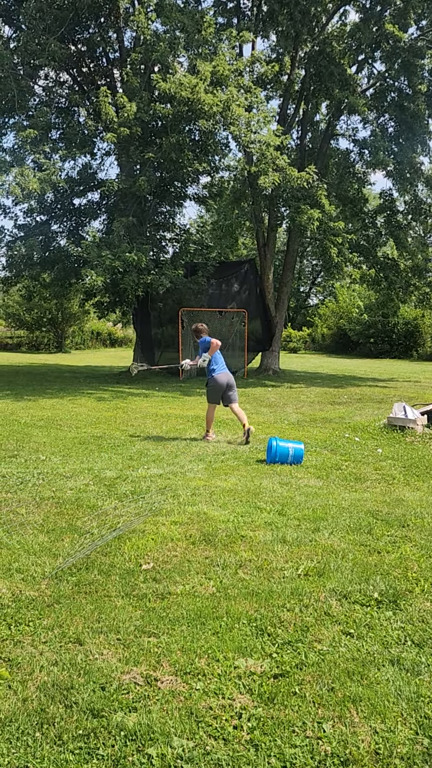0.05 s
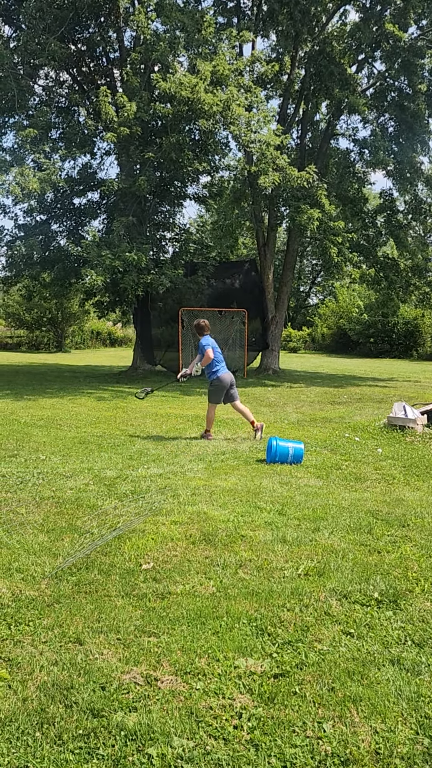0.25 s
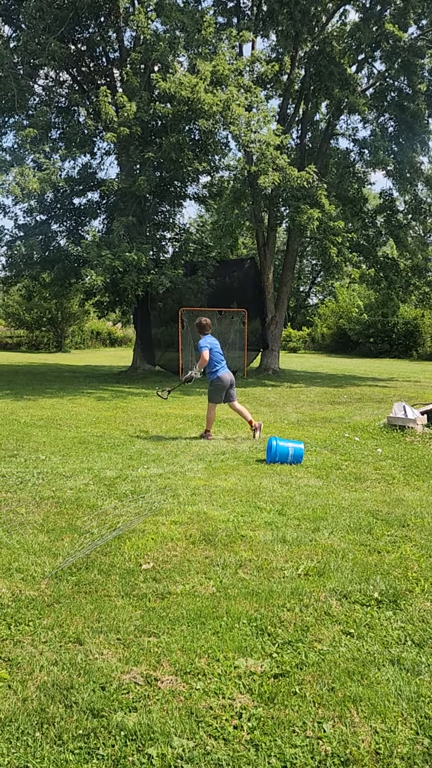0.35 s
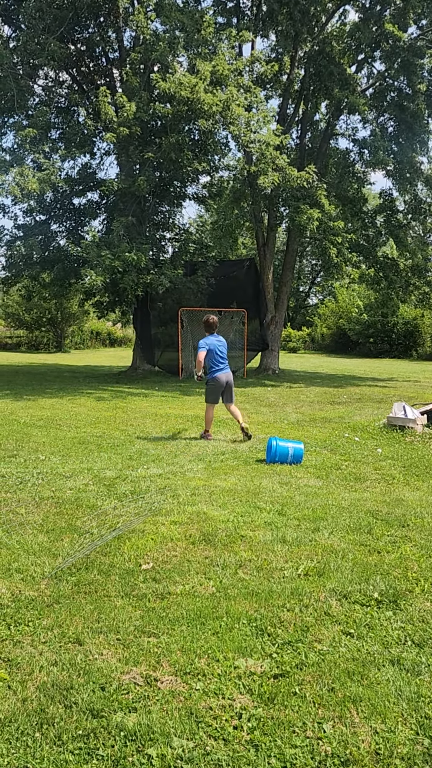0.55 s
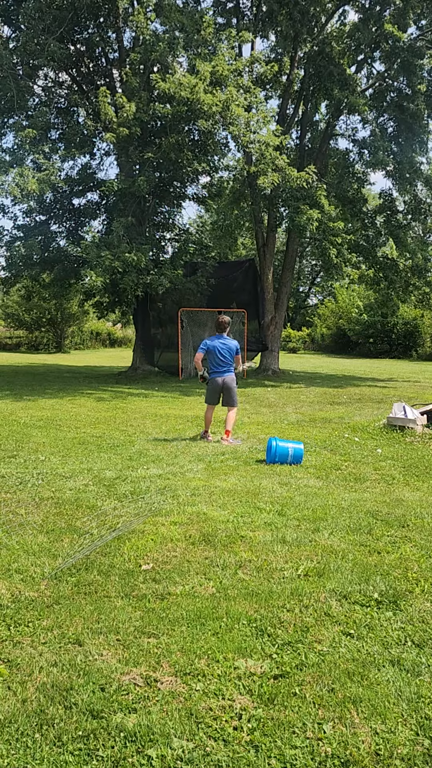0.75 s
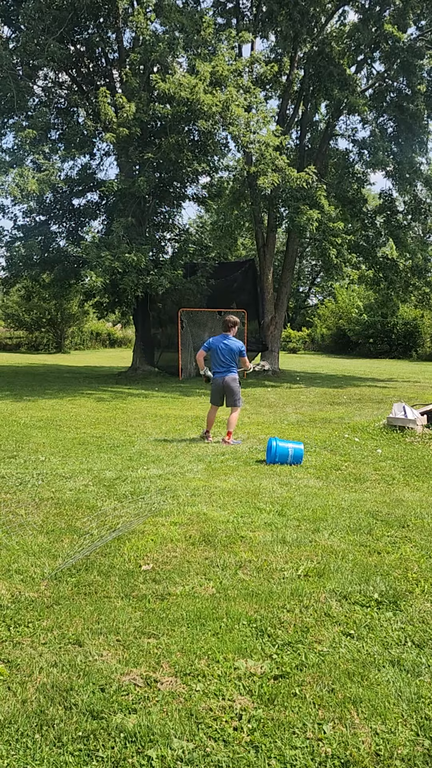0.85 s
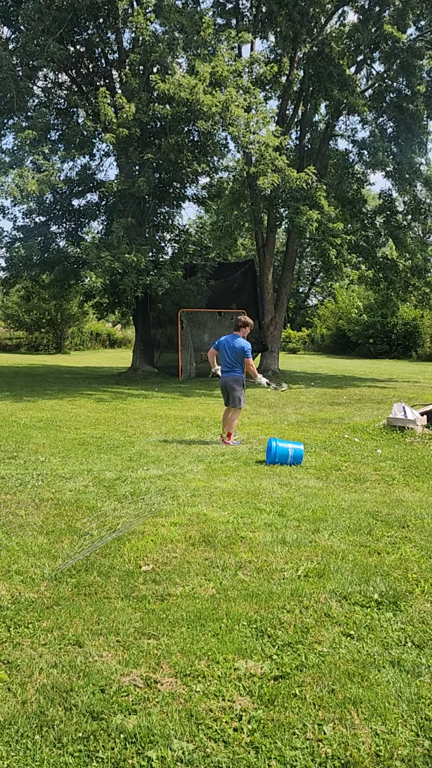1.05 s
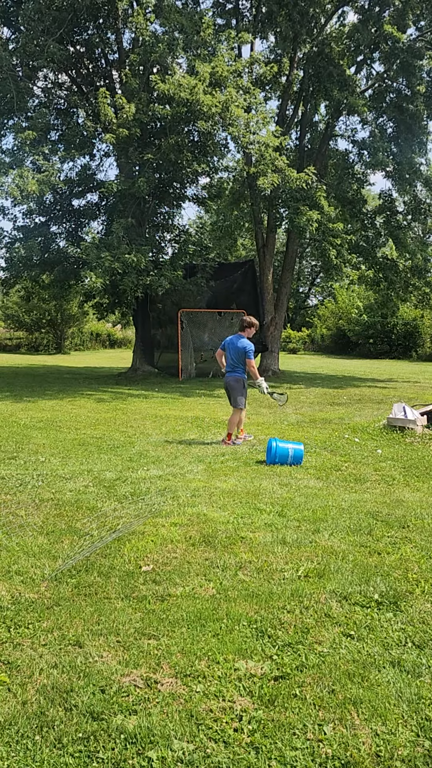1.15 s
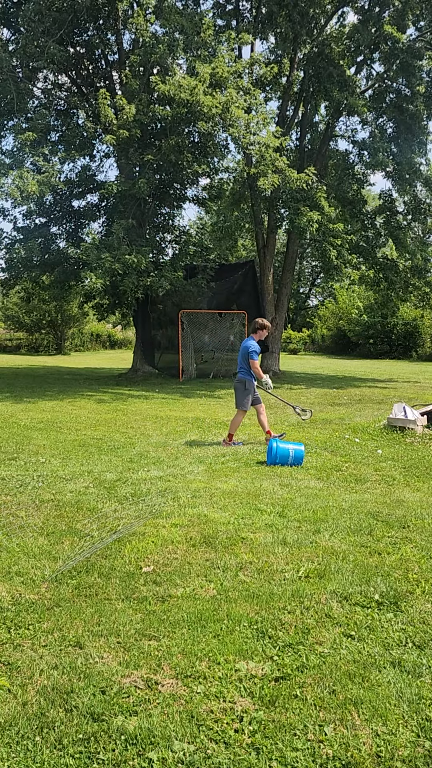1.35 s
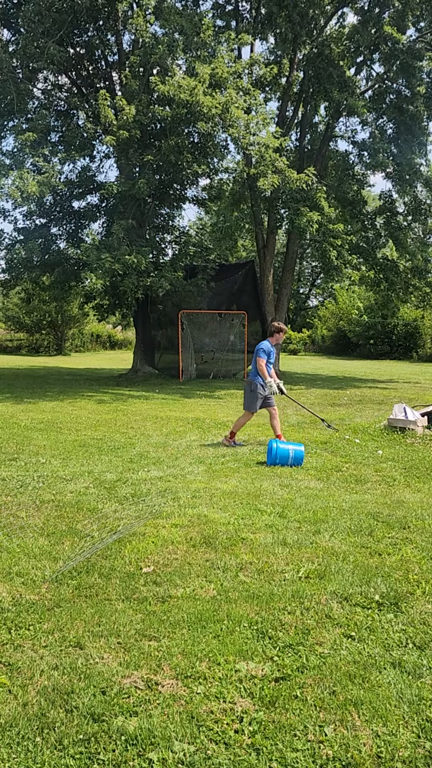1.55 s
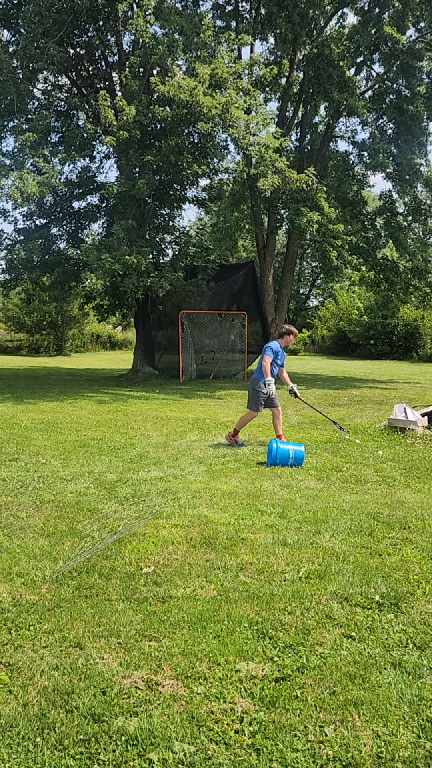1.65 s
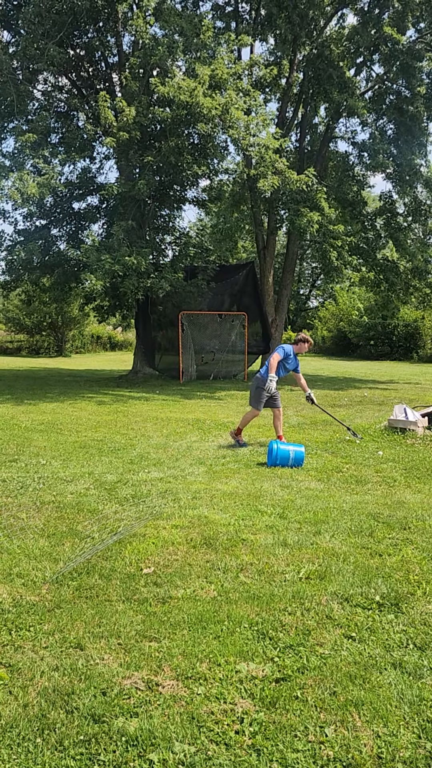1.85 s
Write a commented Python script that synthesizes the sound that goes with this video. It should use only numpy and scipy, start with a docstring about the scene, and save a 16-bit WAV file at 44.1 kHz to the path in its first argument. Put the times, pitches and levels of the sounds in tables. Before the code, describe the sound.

A ball hits a backstop net with a deep thump and hollow crack, followed by a brief flutter and rustle. Faint insect chirping and outdoor rumble continue across the lawn, and a finger taps near the right microphone.

```python
"""On a lawn, an insect chirps high and fast with its wing strokes over outdoor rumble, faint swishes
and a far machine's whine. A hard-thrown ball thumps into a hanging backstop: the sheet slaps twice,
cracks with a hollow ring, billows and flutters, and its shaken netting rattles and settles.
Later a finger brushes and taps the camera by its right microphone."""
import sys
import numpy as np
from scipy.fft import rfft, irfft, next_fast_len
from scipy.io import wavfile
from scipy.ndimage import uniform_filter1d, minimum_filter1d, map_coordinates

SR = 44100
rng = np.random.default_rng(int(sys.argv[2]) if len(sys.argv) > 2 else 0)


def unload_audio(sound):
    """Save the sound as a 16-bit wav file, at the path given as the first command line argument."""
    columns = np.transpose(np.atleast_2d(sound))
    # keep every value between -1 and 1, then stretch to whole-number steps
    steps = np.round(np.clip(columns, -1, 1) * 32767)
    wavfile.write(sys.argv[1], SR, steps.astype(np.int16))


N = 83790
TIME = np.arange(N) / SR


def amp(db):
    """Decibels to amplitude ratio."""
    return 10 ** (np.asarray(db) / 20)


def unit(x):
    """Normalisation to rms 1."""
    return x / np.sqrt(np.mean(x ** 2) + 1e-20)


def along(points, hz):
    """Interpolation on a logarithmic frequency axis."""
    knots, values = np.transpose(points)
    return np.interp(np.log(hz + 1), np.log(knots + 1), values)


def contour(points):
    """Linear interpolation in time."""
    return np.interp(TIME, *np.transpose(points))


def pan(db):
    """Stereo gains for a level difference, left over right."""
    return amp(np.array([[db], [-db]]) / 2)


def wobble(rate):
    """Random modulation: a spline through `rate` Gaussian values a second."""
    return map_coordinates(rng.standard_normal(int(N * rate / SR) + 4), [TIME * rate])


def filtered(x, response):
    """Linear filtering: the spectrum times a frequency response."""
    size = next_fast_len(N + SR // 2)
    return irfft(rfft(x, size) * response(np.fft.rfftfreq(size, 1 / SR)), size)[..., :N]


# Coherence of the outdoor field: (frequency [Hz], left-right correlation [1])
FIELD_COHERENCE = [(60, 1), (130, .99), (290, 0.99), (640, 0.87), (1400, 0.42), (3100, 0), (15000, 0)]
def noise(spectrum, coherence=FIELD_COHERENCE):
    """Partially coherent stereo noise of rms 1: the mid-side ratio sets the correlation."""
    def response(hz):
        angle = np.arccos(np.clip(along(coherence, hz), -1, 1)) / 2
        return amp(along(spectrum, hz)) * [np.cos(angle), np.sin(angle)]
    mid, side = filtered(rng.standard_normal((2, N)), response)
    return unit(np.array([mid + side, mid - side]))


def fade(start, t60, attack):
    """Exponential decay, 60 dB in t60 seconds, after a quick rise."""
    age = np.maximum(TIME - start, 0)
    return (1 - np.exp(-age / attack)) * np.exp(-np.log(1000) * age / t60)


def ring(start, hz, t60):
    """Free vibration of one damped mode."""
    return np.sin(2 * np.pi * hz * (TIME - start)) * fade(start, t60, attack=.00084)


def push(centre, hz):
    """Pressure pulse radiated by a surface that is shoved out and springs back."""
    phase_squared = (np.pi * hz * (TIME - centre)) ** 2
    return (1 - 2 * phase_squared) * np.exp(-phase_squared)


# Outdoor air: (frequency [Hz], relative level [dB])
AIR_SPECTRUM = [(12, -53), (20, -33), (40, -2), (53, 0), (126, -5), (157, -11), (225, -9), (259, -16),
                (289, -9.5), (324, -19), (465, -13), (581, -15.5), (767, -19.5), (834, -20), (1070, -19.5),
                (1230, -22), (2470, -29), (2680, -34.5), (3850, -32.5), (5090, -39), (8640, -36.5),
                (9390, -54), (15500, -55.5)]
# Drift of the whole air noise: (time [s], gain [dB])
AIR_DRIFT = [(0, 3), (.12, 1.5), (.35, .3), (.8, 0), (1.3, -.4), (1.9, -.3)]
# Further sway of its low band: (time [s], gain [dB])
RUMBLE_SWAY = [(0, -1), (.5, 0), (.78, .5), (1.15, -3), (1.45, -2), (1.72, -3), (1.9, .5)]
def air(crossover_hz=210):
    """Broadband ambient noise under slow amplitude modulation, deeper in the low rumble."""
    broadband = amp(-46.5 + contour(AIR_DRIFT) + .68 * wobble(8.08)) * noise(AIR_SPECTRUM)
    rumble = filtered(broadband, lambda hz: 1 / (1 + (hz / crossover_hz) ** 4))
    sway = amp(contour(RUMBLE_SWAY) + .8 * wobble(12))
    return broadband - rumble + sway * rumble


# Partials of the far machine: (frequency [Hz], rms level [dB])
WHINE_PARTIALS = [(759.5, -61), (1051, -64), (1810, -68), (2394.5, -76.5)]
def machine_whine():
    """A line spectrum, each partial wavering in amplitude and phase."""
    whine = np.zeros((2, N))
    for hz, db in WHINE_PARTIALS:
        peak = np.sqrt(2) * amp(db + 1.46 * wobble(4.12))
        phase_drift = .38 * np.array([wobble(5.2), wobble(4.9)])
        whine += peak * np.sin(2 * np.pi * hz * TIME + phase_drift)
    return whine


# Balance of the ambience: (frequency [Hz], left over right [dB])
AMBIENT_BALANCE = [(100, 0.55), (700, 0.9), (1300, 3), (2400, -0.8), (7000, 4.5), (15000, -1.5)]
def ambience():
    """Air and machine superpose, with a level difference that depends on frequency."""
    return filtered(air() + machine_whine(), lambda hz: pan(along(AMBIENT_BALANCE, hz))[:, 0])


# Bouts of chirps: (start [s], end [s], period [s], start level [dB], end level [dB])
CHIRP_BOUTS = [(.001, .29, .0544, -63.2, -63.2), (.4045, 1.91, .0531, -65.5, -65.5)]
def insect(stroke_s=.024, crest_hz=8690, sag_hz=1300, flick_hz=450):
    """Frequency modulation: each wing stroke is a thin whistle that arches, then drops at its end."""
    chirps = np.zeros(N)
    for first, last, period, start_db, end_db in CHIRP_BOUTS:
        for start in np.arange(first, last, period):
            progress = np.clip((TIME - start - rng.normal(0, .00068)) / stroke_s, 0, 1)
            arch = crest_hz + rng.normal(0, 25) - sag_hz * (progress - .42) ** 2
            hz = arch - flick_hz * rng.uniform(.5, 1.5) * progress ** 6
            db = np.interp(start, [first, last], [start_db, end_db]) + rng.normal(0, .6)
            envelope = amp(db) * np.abs(np.sin(np.pi * progress)) ** .4
            chirps += envelope * np.sin(2 * np.pi * np.cumsum(hz) / SR)
    return pan(db=16) * chirps * amp(wobble(330))


# Faint swishes: (time [s], level [dB], half-width [s])
SWISHES = [(.06, -77, 0.14), (.215, -76, .03), (.47, -79.5, .014), (.525, -81, .012), (.567, -81, .005),
           (.71, -78, .025)]
# Their hiss: (frequency [Hz], relative level [dB])
SWISH_SPECTRUM = [(4000, -12), (7000, -4), (10000, 0), (11700, 3.5), (15500, -9)]
def swishes():
    """High noise comes and goes under Gaussian envelopes."""
    envelope = sum(amp(db) * np.exp(-((TIME - centre) / width) ** 2) for centre, db, width in SWISHES)
    return envelope * noise(SWISH_SPECTRUM)


# Slaps of the sheet: (time [s], peak level [dB], rise time [s])
SHEET_SLAPS = [(.2425, 0, 0.0031), (.2740, -11, 0.0049)]
IMPACT_S = SHEET_SLAPS[0][0]
def thump(start_hz=246, end_hz=65.4, slacken_s=.0061, cutoff_hz=345):
    """Damped oscillation that slows as the sheet gives; the soft sheet acts as a low-pass filter."""
    swings = np.zeros(N)
    for start, db, rise in SHEET_SLAPS:
        age = np.maximum(TIME - start, 0)
        cycles = end_hz * age + (start_hz - end_hz) * slacken_s * (1 - np.exp(-age / slacken_s))
        envelope = (age / rise * np.exp(1 - age / rise)) ** 1.96
        swings -= amp(db) * envelope * np.sin(2 * np.pi * cycles)
    return filtered(swings, lambda hz: 1 / np.sqrt(1 + (hz / cutoff_hz) ** 12))


# The settling net: (frequency [Hz], relative level [dB])
SETTLE_SPECTRUM = [(2000, -22), (4000, 3), (6000, -5), (7200, 4), (9500, -8), (12300, -4), (15500, -10)]
def net_settling():
    """Slow exponential decay: the net rustles faintly from the impact on."""
    rustle = unit(noise(SETTLE_SPECTRUM) * amp(2 * wobble(65)))
    return amp(-63) * rustle * fade(IMPACT_S, t60=1.2, attack=.004)


# Cracks of taut fabric: (time [s], level [dB], t60 [s], ring level [dB])
FABRIC_CRACKS = [(.2428, -16.5, 0.025, -33.5), (.2690, -33, 0.044, -27.5), (.2750, -35, 0.032, -38.5)]
# Their noise: (frequency [Hz], relative level [dB])
CRACK_SPECTRUM = [(150, -24), (420, -20), (600, -8), (950, 0), (1400, -13), (2000, -18), (2600, -22),
                  (3300, -19), (4500, -26), (7000, -37), (10000, -52), (15000, -54)]
# Their coherence: (frequency [Hz], left-right correlation [1])
CRACK_COHERENCE = [(200, .95), (600, 0.35), (1200, 0.39), (15000, 0.44)]
# Modes of the backstop: (frequency [Hz], relative level [dB], t60 [s])
HOLLOW_MODES = [(573, -1, .065), (940, -1, .04), (1347, -15, .05)]
def fabric_cracks():
    """Impulse excitation: each crack is a noise burst that sets the backstop's hollow modes ringing."""
    envelope = sum(amp(db) * fade(start, t60, attack=.0005) for start, db, t60, _ in FABRIC_CRACKS)
    bursts = envelope * noise(CRACK_SPECTRUM, CRACK_COHERENCE)
    hollow = sum(amp(ring_db + db + rng.normal(0, 1.4)) * ring(start, hz, t60)
                 for start, _, _, ring_db in FABRIC_CRACKS for hz, db, t60 in HOLLOW_MODES)
    return pan(db=2) * bursts + pan(db=.5) * hollow


# The fluttering sheet: (frequency [Hz], relative level [dB])
FLUTTER_SPECTRUM = [(20, -11), (40, -2.5), (90, 7.5), (170, -4.5), (280, -5.5), (400, -28.5), (600, -23),
                    (1200, -23), (2500, -34.5), (6000, -48), (10000, -73.5), (15000, -80)]
def flutter():
    """Irregular motion of the sheet radiates low noise that damping takes away."""
    return amp(-21) * fade(start=.2496, t60=.33, attack=.011) * noise(FLUTTER_SPECTRUM)


def billow():
    """The whole sheet bellies out in a single low mode."""
    return amp(-28) * ring(IMPACT_S + .012, hz=31, t60=.22)


# The shaken net: (frequency [Hz], relative level [dB])
RATTLE_SPECTRUM = [(1000, -17), (2200, -6), (3500, -2.5), (5000, -1), (5900, -13), (6600, 4), (7600, -0.5),
                   (9000, -16), (11500, -19), (12600, -14), (15500, -30)]
# Modes of its metal fittings: (frequency [Hz], level [dB], t60 [s])
FITTING_MODES = [(6530, -46, .04), (6930, -63, 0.27), (7400, -50, .05), (12550, -63, .1)]
def net_rattle(start=.295):
    """Shaking excites a grainy rustle in the net and damped resonances in its fittings."""
    grains = unit(noise(RATTLE_SPECTRUM) * amp(2 * wobble(249)))
    rustle = amp(-49.5) * grains * fade(start, t60=.4, attack=.0018)
    clink = sum(amp(db + rng.normal(0, 2, (2, 1))) * ring(start, hz, t60)
                for hz, db, t60 in FITTING_MODES)
    return rustle + clink * amp(3 * wobble(199))


# The finger's brushing stroke: (time [s], level [dB])
BRUSH_LEVEL = [(1.2, -97), (1.29, -75.5), (1.40, -75), (1.435, -59), (1.485, -55), (1.575, -60.5),
               (1.605, -86), (1.66, -100)]
# Its friction noise: (frequency [Hz], relative level [dB])
FRICTION_SPECTRUM = [(500, -4), (2000, 4.5), (4000, -3.5), (6000, -4.5), (8000, -1), (9200, -4.5),
                     (10500, -4.5), (12000, 4.5), (15500, -4)]
def finger(tap_s=1.44465):
    """Friction and impact on the camera body: a gritty brush, a tap, a short scrape and a soft bump."""
    fingertip = amp(-14.5) * push(tap_s, hz=790)
    nail = amp(-35) * push(tap_s, hz=1800)
    tap = (fingertip + nail) * np.array([[.27], [-1]])  # weaker and in antiphase on the left
    brush = amp(contour(BRUSH_LEVEL) + 1.2 * wobble(300))
    scrape = amp(-38) * fade(tap_s, t60=.023, attack=.00093)
    friction = pan(db=-8) * (brush + scrape) * noise(FRICTION_SPECTRUM)
    bump = amp(-38) * push(1.4905, hz=79)
    return tap + friction + bump


def scene(lead_s=.00009):
    """Superposition, with a time difference: backstop and ambience reach the left microphone first."""
    backstop = thump() + fabric_cracks() + flutter() + billow() + net_rattle() + net_settling()
    lead = np.array([[lead_s], [-lead_s]]) / 2
    lawn = filtered(backstop + ambience(), lambda hz: np.exp(2j * np.pi * hz * lead))
    return lawn + insect() + swishes() + finger()


def record(dry, ceiling=.98, window_s=.003, band_limit_hz=15850):
    """Peak limiting holds down the thump; the camera passes nothing above its band limit."""
    window = int(window_s * SR)
    needed_gain = ceiling / np.maximum(np.abs(dry).max(axis=0), ceiling)
    gain = uniform_filter1d(minimum_filter1d(needed_gain, window), window)
    return filtered(dry * gain, lambda hz: hz < band_limit_hz)


dry = scene()
out = record(dry)
unload_audio(out)
```